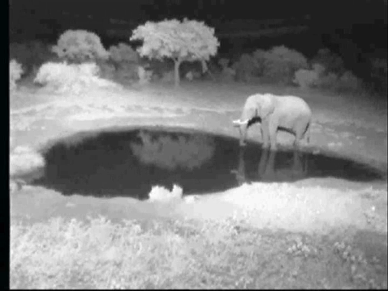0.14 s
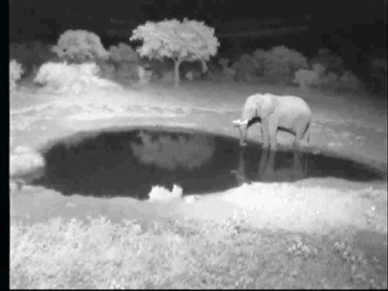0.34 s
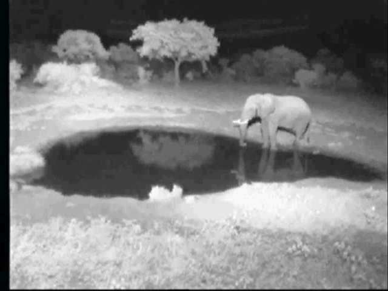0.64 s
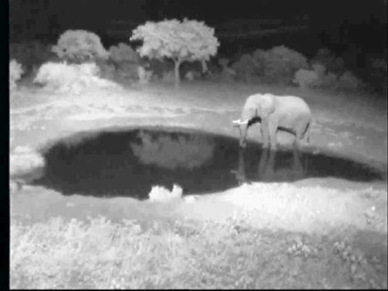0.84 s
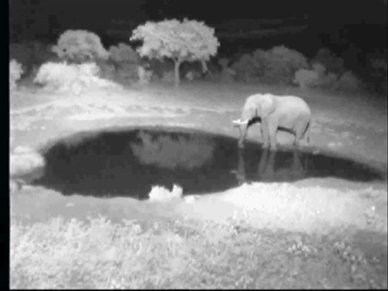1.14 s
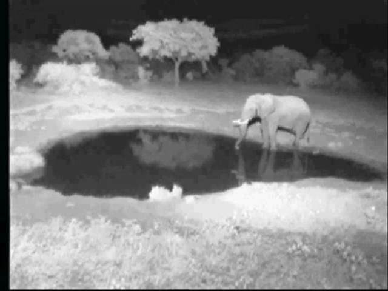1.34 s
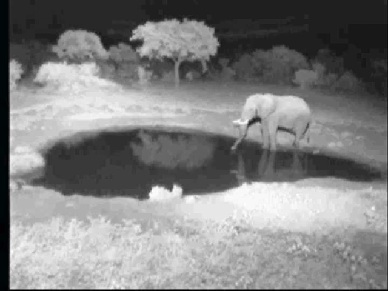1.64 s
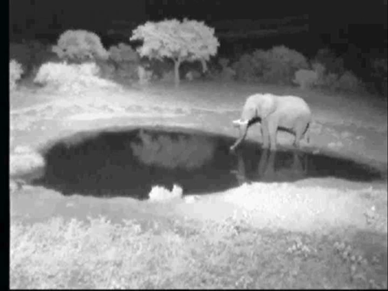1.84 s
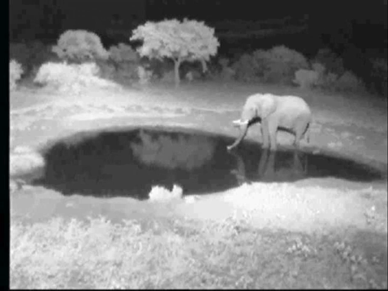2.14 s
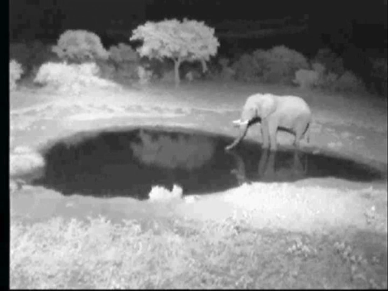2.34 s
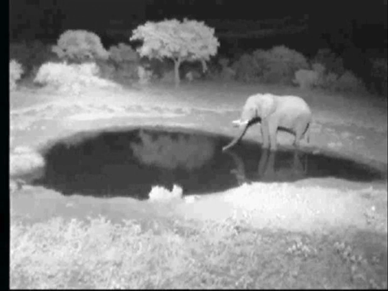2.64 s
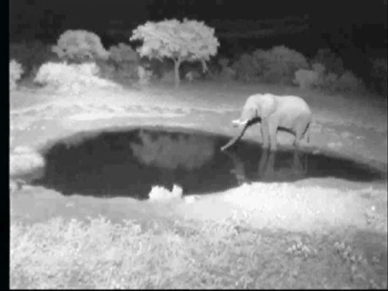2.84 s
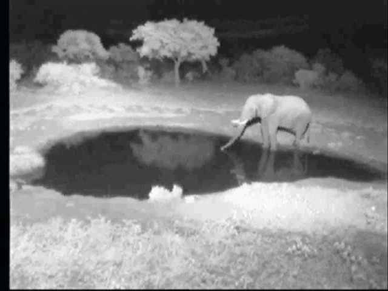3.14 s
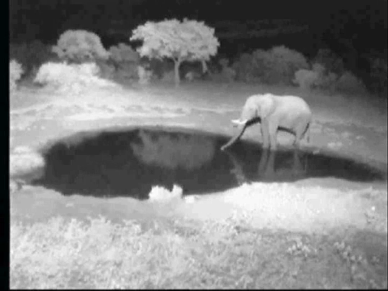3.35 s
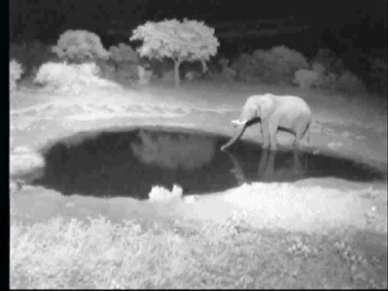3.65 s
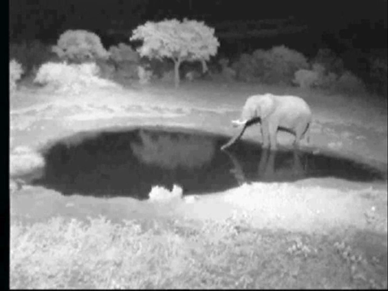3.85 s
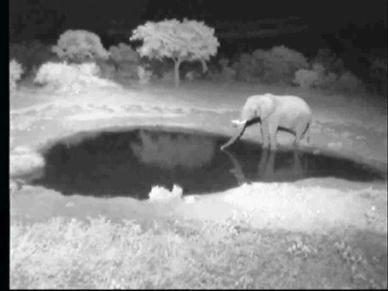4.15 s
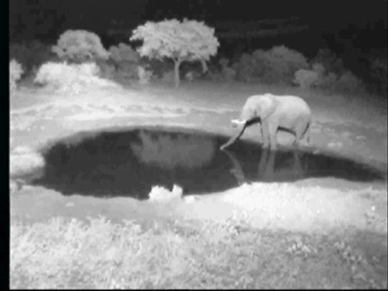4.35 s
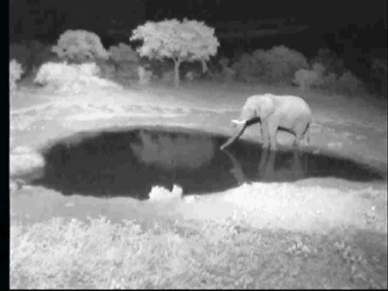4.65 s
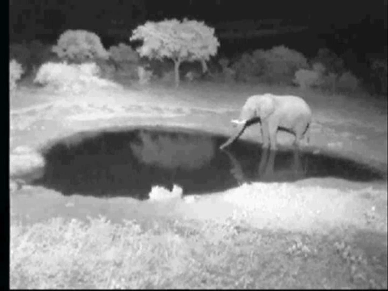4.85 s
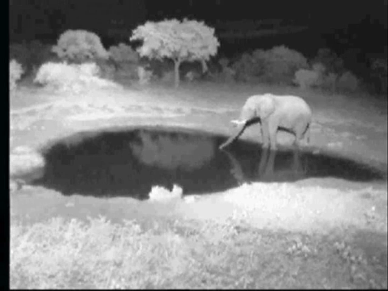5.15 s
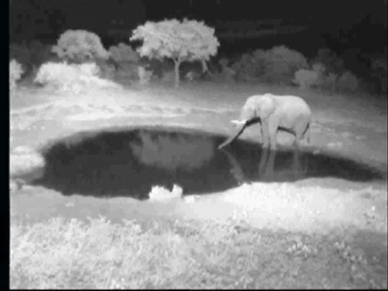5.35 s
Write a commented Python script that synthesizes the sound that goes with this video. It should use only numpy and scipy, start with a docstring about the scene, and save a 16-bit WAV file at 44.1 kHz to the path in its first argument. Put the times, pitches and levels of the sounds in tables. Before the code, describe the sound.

Night insects dominate for the whole 5.5 seconds. Shrill near crickets around 5 kHz give short buzzing chirps roughly four times a second, each swelling and fading. A triller near 3.5 kHz is clearest in the first 1.6 seconds, then weakens; a deeper, softer cricket near 2.5 kHz is most noticeable around 3 seconds. Short runs of downward-sliding ticks appear early and return after 3.4 seconds. Small water drips plop at about 0.2 and 0.4, then ringing drops at 2.1 to 2.5. The elephant's trunk releases a bubbly, gurgling gush with fine spray at 3.2, and another at 4.4 to 4.6, each lasting a fraction of a second with a faint echo from the trees. Behind are even air hiss, a distant insect chorus that thins out, faint low rumble and mains hum. The fixed outdoor camera sounds coarse and gritty, with metallic mirrored treble.

```python
"""Night at a waterhole

An elephant lets water drip from its trunk and squirts it out twice: ringing bubbles and showers of tiny hits.
Three kinds of cricket chirp with quick wing strokes, among runs of falling insect ticks.
Behind them lie still air, a faint rumble, a far insect chorus (all shaped noise) and mains hum (sine tones).
A fixed outdoor camera with a coarse sample rate mirrors the sound into the treble.
"""
import sys
import numpy as np
from scipy import signal
from scipy.fft import rfft, irfft, next_fast_len
from scipy.io import wavfile
from scipy.ndimage import map_coordinates

SR = 44100
rng = np.random.default_rng(int(sys.argv[2]) if len(sys.argv) > 2 else 0)


def wav_out(sig):
    """Save sig, one row per channel (or a flat mono array), as 16-bit PCM at SR to the path in sys.argv[1]."""
    wavfile.write(sys.argv[1], SR, np.round(np.clip(np.atleast_2d(sig).T, -1, 1) * 32767).astype(np.int16))


N = 242991
TIME = np.arange(N) / SR  # seconds


# single bubbles of drips and squirts, level before the soft start:
# (time [s], level [dB], starting pitch [Hz], time to fall by 60 dB [s])
BUBBLES = [(.231, -18, 1063, .038), (.4, -23, 1380, 0.039), (2.092, -19, 2300, 0.034),
           (2.317, -13.5, 1467, .04), (2.316, -20, 1640, 0.021), (2.454, -21, 740, 0.032),
           (2.454, -15.5, 1126, 0.011), (3.179, -7, 850, 0.007), (3.188, -6, 1266, 0.014),
           (3.2045, -2.5, 920, .012), (3.206, -6, 540, 0.023), (3.224, -12, 1060, 0.011),
           (3.99, -29, 535, 0.086), (4.3835, -15, 1960, 0.024), (4.482, -11, 910, 0.016),
           (4.489, -9, 600, 0.02), (4.506, -4.5, 1080, 0.0086), (4.517, -6, 1530, 0.011),
           (4.523, -10, 1870, 0.0069), (4.526, -8, 720, .012)]


def plops():
    """Each trapped bubble rings, rising a little as it nears the surface, and dies faster once there."""
    out = np.zeros(N + SR)
    t = np.arange(SR // 4) / SR
    for start, db, hz, t60 in BUBBLES:
        pitch = hz * (1 + 0.11 * np.minimum(t / t60, 1))
        tone = np.sin(2 * np.pi * np.cumsum(pitch) / SR)
        fade = amp(-60 * (t / t60) ** 2)
        soft_start = 1 - np.exp(-t / 0.0018)
        out[round(start * SR):][:len(t)] += amp(db) * tone * fade * soft_start
    return out[:N]


# water hitting the pond, level before the clumps; rise and fall are the times from or to 20 dB below the peak:
# (time of peak [s], rise [s], fall [s], gurgle level [dB], spray level against the gurgle [dB])
SPLASHES = [(.404, 0.018, 0.051, -28.5, -11), (2.456, .0034, 0.069, -28.5, -24),
            (3.195, 0.12, 0.089, -19, -11.5), (4.52, 0.07, 0.064, -17.5, -7)]
# tone colour of the low gurgle: (frequency [Hz], relative level [dB])
GURGLE_COLOUR = [(120, -25), (230, -8.5), (400, -4.5), (550, 4), (900, -1), (1400, -4.5), (2000, -11),
                 (3200, -39), (5500, -78)]
# tone colour of the finer spray: (frequency [Hz], relative level [dB])
SPRAY_COLOUR = [(500, -34), (1200, -24), (2200, 11), (3150, 12.5), (3700, -5), (5500, -30)]
CLUMP_DB, CLUMP_RATE = 1, 150  # the water lands in clumps: rough spread [dB], random points per second


def splashes():
    """A gush from the trunk swells and dies, landing in clumps: a low gurgle with a finer spray on top."""
    gurgle_level, spray_level = np.zeros(N), np.zeros(N)
    for peak, rise, fall, db, spray_db in SPLASHES:
        away = np.maximum((peak - TIME) / rise, (TIME - peak) / fall)
        flow = amp(db - 20 * away ** 1.92)
        gurgle_level += flow
        spray_level += flow * amp(spray_db)
    gurgle = coloured(patter(per_second=3000, spread_db=2.0), GURGLE_COLOUR)
    spray = coloured(patter(per_second=2100, spread_db=4), SPRAY_COLOUR)
    clumps = unit(amp(CLUMP_DB * wobble(CLUMP_RATE)))
    return clumps * (gurgle_level * gurgle + spray_level * spray)


def patter(per_second, spread_db):
    """A dense shower of tiny impacts of very unequal size."""
    hits = rng.random(N) < per_second / SR
    return hits * rng.standard_normal(N) * amp(spread_db * rng.standard_normal(N))


# how long the trees echo: (frequency [Hz], time to fall by 60 dB [s])
TREE_ECHO = [(200, 0.23), (1000, 0.32), (5000, 0.1)]


def bush(x):
    """The trees round the pond answer a moment later with a smear of echoes; treble dies first."""
    hz, t, noise = signal.stft(rng.standard_normal(SR // 2), SR, nperseg=256)
    t60 = along(TREE_ECHO, hz)[:, None]
    tail = signal.istft(noise * amp(-60 * t / t60), SR, nperseg=256)[1]
    late = np.pad(x, (600, 0))  # delay in samples
    return signal.fftconvolve(late, tail / np.linalg.norm(tail))[:N]


# chirps of the near, shrill crickets, before a small trim: (start time [s], end time [s], mid-chirp level [dB])
SHRILL_CHIRPS = [(0.054, 0.21, -21), (0.285, 0.433, -21), (0.502, 0.651, -20), (0.732, 0.856, -18),
                 (0.979, 1.137, -19), (1.231, 1.375, -21), (1.459, 1.609, -20), (1.632, 1.798, -21),
                 (1.859, 2.025, -20.5), (2.098, 2.265, -21), (2.398, 2.581, -20.5), (2.587, 2.796, -21),
                 (2.878, 3.032, -20.5), (3.08, 3.244, -22), (3.344, 3.543, -21), (3.594, 3.75, -21.5),
                 (3.803, 3.958, -21), (4.007, 4.177, -20), (4.256, 4.457, -19), (4.471, 4.635, -20),
                 (4.708, 4.869, -18.5), (4.919, 5.12, -19.5), (5.157, 5.328, -17.5), (5.374, 5.52, -18)]
# far shrill crickets: (time [s], level [dB])
NEIGHBOURS = [(0, -34), (2.35, -33), (2.8, -31.5), (3.3, -37), (4.6, -29), (5.5, -31.5)]


def shrill_crickets():
    """Two near crickets chirp in step, swelling to mid-chirp; far neighbours blend into narrow noise."""
    lead = strokes(pitch_hz=5085, rate=100, fall=.03, duty=1, jitter=.22, wander=.005, scatter_db=.9, taper=.6)
    second = strokes(pitch_hz=4903, rate=67, fall=0.095, duty=1, jitter=0.096, wander=0.012, scatter_db=-0.5)
    pair = amp(.8) * unit(lead + amp(-8) * second)
    near = scattered(chirping(SHRILL_CHIRPS, swell_db=6.5) * pair, t60=.06, wet_db=-11)
    # (frequency [Hz], relative level [dB])
    far_colour = [(4000, -25), (4700, 3.5), (4950, 13), (5150, 11.0), (5350, 1), (5500, -47)]
    far = coloured(rng.standard_normal(N), far_colour)
    return near + amp(curve(NEIGHBOURS) + 1.2 * wobble(40)) * far


# chirps of the triller, mostly fading, before a small trim: (start time [s], end time [s], mid-chirp level [dB])
TRILLER_CHIRPS = [(-.05, .05, -26.5), (.22, .38, -26), (.42, .56, -28.5), (.63, .79, -27.5),
                  (.84, 1.02, -26.5), (1.07, 1.27, -27), (1.33, 1.52, -28), (1.62, 1.79, -33),
                  (1.95, 2.13, -35), (2.76, 2.9, -35), (3.0, 3.18, -36), (3.24, 3.45, -36.5),
                  (3.52, 3.67, -38), (3.8, 3.89, -35), (3.93, 4.07, -32), (4.18, 4.31, -32.5),
                  (4.6, 4.76, -37), (4.86, 4.96, -37), (5.07, 5.19, -35), (5.47, 5.57, -36)]
# chirps of the deepest cricket, before a small trim: (start time [s], end time [s], mid-chirp level [dB])
LOW_CHIRPS = [(-.02, .15, -34.5), (.18, .36, -35), (.5, .58, -37.5), (.66, .76, -39), (.87, 1.02, -33),
              (1.11, 1.33, -31.5), (1.54, 1.68, -31.5), (1.76, 1.91, -32.5), (1.94, 2.03, -34),
              (2.08, 2.2, -35), (2.27, 2.41, -33), (2.5, 2.68, -32), (2.76, 2.95, -29), (3.0, 3.17, -28.5),
              (3.22, 3.41, -30), (3.57, 3.72, -30.5), (3.93, 4.02, -31.5), (4.12, 4.3, -31.5),
              (4.39, 4.59, -34), (4.77, 4.86, -38), (5.02, 5.18, -36.5), (5.3, 5.38, -36.5)]
TRILL_GAP_DB, LOW_GAP_DB = -41, -49  # soft stroking between chirps, before the same trims


def lower_crickets():
    """A triller with a faint neighbour, and a slower, deeper cricket; strokes go on softly between chirps."""
    trill = strokes(pitch_hz=3500, rate=55.6, fall=.085, duty=.76, jitter=.015, wander=.011, scatter_db=1.2)
    neighbour = strokes(pitch_hz=3475, rate=58, fall=.1, duty=.72, jitter=.076, wander=.02, scatter_db=1.5)
    trills = unit(trill + amp(-9) * neighbour)
    low = strokes(pitch_hz=2495, rate=45, fall=.06, duty=.7, jitter=.07, wander=.008, scatter_db=1.5)
    trill_level = np.hypot(chirping(TRILLER_CHIRPS, swell_db=3), amp(TRILL_GAP_DB))
    low_level = np.hypot(chirping(LOW_CHIRPS, swell_db=3.5), amp(LOW_GAP_DB))
    calls = amp(-1.8) * trills * trill_level + amp(-.7) * low * low_level
    return scattered(calls, t60=.07, wet_db=-6.5)


# runs of falling ticks: (start time [s], end time [s], middle pitch [Hz], mid-run level [dB])
TICK_RUNS = [(0.356, .475, 4280, -22.5), (0.472, .54, 4000, -26), (0.528, 0.68, 4380, -27),
             (0.852, 1, 5040, -25.5), (1.41, 1.62, 4650, -30), (1.76, 1.88, 4470, -33),
             (2.0, 2.134, 3120, -34), (3.395, 3.562, 4970, -26), (3.936, 4.14, 4820, -27),
             (4.275, 4.486, 5000, -27), (4.855, 5.177, 4960, -29.5)]
TICK_SWELL_DB = 5  # growth over a run


def falling_ticks():
    """Runs of brief ticks, each sliding steeply down in pitch; a run grows louder from first to last."""
    out = np.zeros(N)
    for start, end, hz, db in TICK_RUNS:
        gate = np.clip(np.minimum(TIME - start, end - TIME) / .02, 0, 1)  # 20 ms edges
        progress = np.clip((TIME - start) / (end - start), 0, 1)
        ticks = strokes(pitch_hz=hz, rate=58, fall=.24, duty=.62, jitter=.09, wander=.018, scatter_db=1.6)
        out += gate * amp(db + TICK_SWELL_DB * (progress - .5)) * ticks
    return scattered(out, t60=.08, wet_db=-8)


def strokes(pitch_hz, rate, fall, duty, jitter, wander, scatter_db, taper=1):
    """Wing strokes of rms 1: each is a short tone that sinks as the scraper slows along the wing's file."""
    cycle = rng.random() + np.cumsum(rate * (1 + jitter * wobble(25))) / SR
    index = cycle.astype(int)  # which stroke each sample belongs to
    size, detune = rng.standard_normal((index.max() + 1, 2))[index].T
    # duty is the share of each cycle that sounds
    along_file = np.minimum(cycle % 1 / np.clip(duty, .1, 1), 1)
    hz = pitch_hz * (1 + wander * (detune + wobble(7)) - fall * (along_file - .5))
    # the wings stop between strokes, so each tone starts at a new phase
    phase = np.cumsum(hz) / SR + rng.random(index.max() + 1)[index]
    pressure = np.abs(np.sin(np.pi * along_file)) ** taper
    return unit(amp(scatter_db * size) * pressure * np.sin(2 * np.pi * phase))


EDGE_S = .016  # time a chirp takes to start or stop


def chirping(rows, swell_db):
    """Loudness of a cricket: every chirp starts quickly, swells to its middle, sinks and stops."""
    level = np.zeros(N)
    for start, end, db in rows:
        progress = np.clip((TIME - start) / (end - start), 0, 1)
        gate = np.clip(np.minimum(TIME - start, end - TIME) / EDGE_S + .5, 0, 1)
        level += gate * amp(db - swell_db * (2 * progress - 1) ** 2)
    return level


def scattered(x, t60, wet_db):
    """Grass and ground smear a call with many weak, quick reflections."""
    t = np.arange(SR // 4) / SR
    tail = rng.standard_normal(len(t)) * amp(-60 * t / t60)
    reflections = signal.fftconvolve(x, tail / np.linalg.norm(tail))[:N]
    return (x + amp(wet_db) * reflections) / np.hypot(1, amp(wet_db))


# tone colour of the night air: (frequency [Hz], relative level per Hz [dB])
AIR_COLOUR = [(20, -29), (55, -10), (120, 0.5), (250, 1), (400, 4.5), (580, 5), (850, -2), (1400, -4.5),
              (2100, -3), (2800, -0.5), (3150, -0.5), (3850, -1.5), (4500, 1.5), (5500, -4)]


def night_air():
    """Nearly even noise of the night, wavering slightly."""
    return amp(-28.5 + 0.48 * wobble(5.43)) * coloured(rng.standard_normal(N), AIR_COLOUR)


# slow air on the microphone: (time [s], level [dB])
RUMBLE_LEVEL = [(0, -50), (2.1, -66), (3.3, -56), (4.7, -49), (5.5, -48.5)]


def rumble():
    """Slow air moving over the microphone makes a faint, very low noise."""
    # (frequency [Hz], relative level [dB])
    colour = [(15, -15), (45, 2), (90, -10), (300, -36), (1000, -80)]
    return amp(curve(RUMBLE_LEVEL)) * coloured(rng.standard_normal(N), colour)


# far insects, slowly thinning: (time [s], level [dB])
CHORUS_LEVEL = [(0, -31.5), (1.4, -35.5), (2.2, -37), (3.3, -43.5), (5.5, -53)]


def far_chorus():
    """So many far insects that they blend into noise, drifting and flickering in level."""
    # (frequency [Hz], relative level [dB])
    colour = [(1800, -22), (2700, 4.5), (3150, 6.0), (3800, 9.5), (4500, 4.0), (5500, -30.5)]
    insects = coloured(rng.standard_normal(N), colour)
    level_db = curve(CHORUS_LEVEL) + 0.8 * wobble(18) + 0.54 * wobble(60)
    return amp(level_db) * insects


# mains hum: (frequency [Hz], rms level [dB])
HUM_TONES = [(50, -59.5), (100, -47.5), (150, -47), (200, -49.5), (250, -47)]


def mains_hum():
    """Steady tones at multiples of the mains frequency."""
    out = np.zeros(N)
    for hz, db in HUM_TONES:
        out += amp(db) * np.sqrt(2) * np.sin(2 * np.pi * (hz * TIME + rng.random()))
    return out


def amp(db):
    """Decibels to gain."""
    return 10 ** (np.asarray(db) / 20)


def unit(x):
    """Scale to rms 1."""
    return x / np.sqrt(np.mean(x ** 2) + 1e-20)


def along(points, hz):
    """Read (frequency [Hz], value) points on a log axis."""
    f, v = np.transpose(points)
    return np.interp(np.log(hz + 1), np.log(f + 1), v)


def curve(rows):
    """Turn (time [s], value) rows into one value per sample."""
    return np.interp(TIME, *np.transpose(rows))


def wobble(rate):
    """A smooth random curve through rate random points a second."""
    return map_coordinates(rng.standard_normal(int(N * rate / SR) + 4), [TIME * rate])


def filtered(x, response):
    """Change the strength of each frequency in x by the given response."""
    m = next_fast_len(N + SR // 2)
    return irfft(rfft(x, m) * response(np.fft.rfftfreq(m, 1 / SR)), m)[:N]


def coloured(x, spectrum):
    """Give x a tone colour, at rms 1."""
    return unit(filtered(x, lambda hz: amp(along(spectrum, hz))))


def scene():
    """Water at the trunk with its echo, insects all round, the quiet night behind."""
    water = plops() + splashes()
    insects = shrill_crickets() + lower_crickets() + falling_ticks()
    echo = amp(-17.5) * bush(water)
    background = night_air() + rumble() + far_chorus() + mains_hum()
    return (water + echo + insects + background)[None]


HOLD = 4  # samples per held value
SOFT_EDGE_HZ, TOP_HZ = 5640, 15550  # gentle bend of the cut before sampling; highest pitch let out


def record(dry):
    """The camera samples at a quarter rate and holds each value, which mirrors the sound into the treble."""
    # nothing passes from half the coarse rate up; the treble bends down slightly just below it
    narrow = filtered(dry[0], lambda hz: (hz < SR / HOLD / 2) / np.hypot(1, (hz / SOFT_EDGE_HZ) ** 50))
    held = np.repeat(narrow[::HOLD], HOLD)[:N]
    offset = .0145  # the converter rests slightly off zero
    return filtered(held, lambda hz: hz < TOP_HZ)[None] + offset


dry = scene()
out = record(dry)
wav_out(out)
```